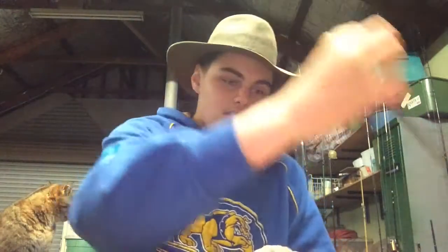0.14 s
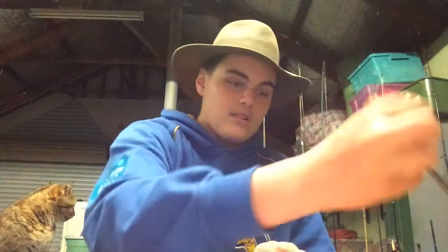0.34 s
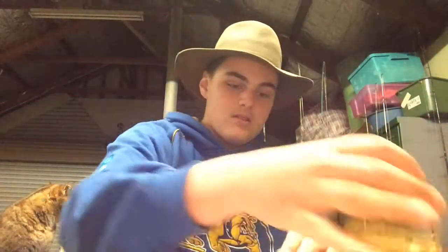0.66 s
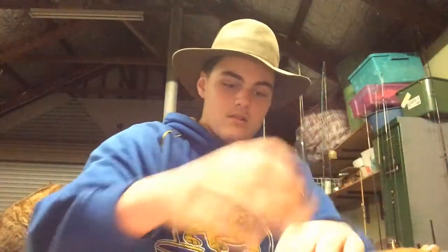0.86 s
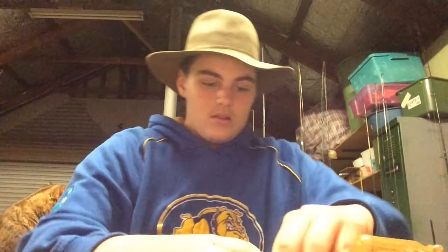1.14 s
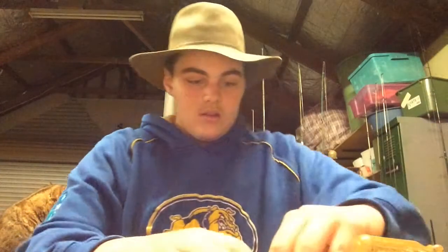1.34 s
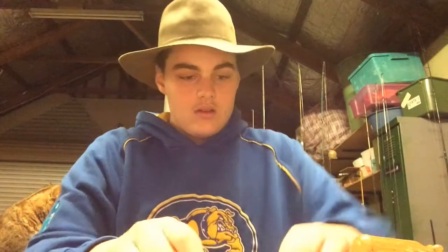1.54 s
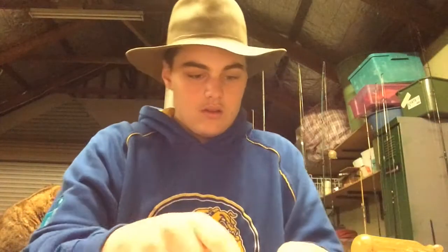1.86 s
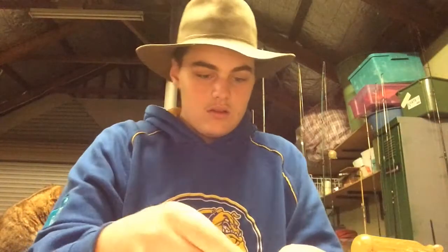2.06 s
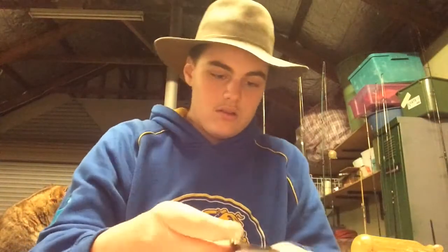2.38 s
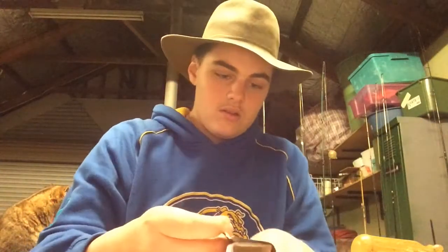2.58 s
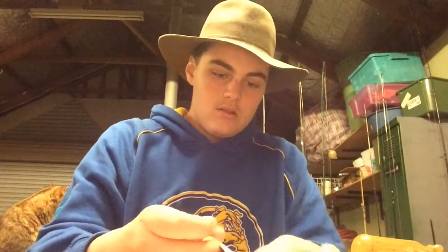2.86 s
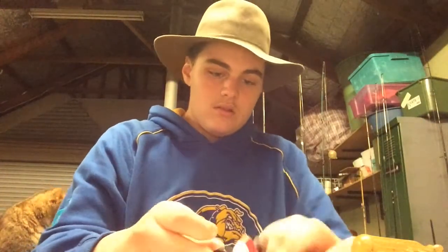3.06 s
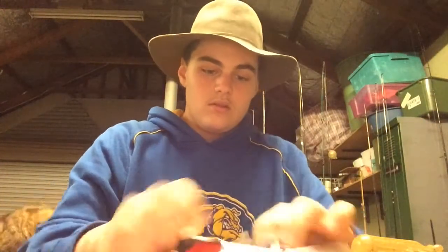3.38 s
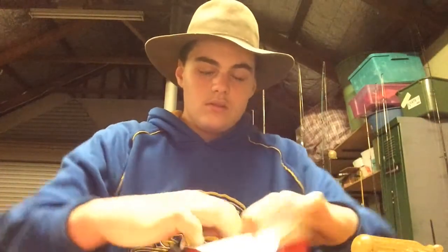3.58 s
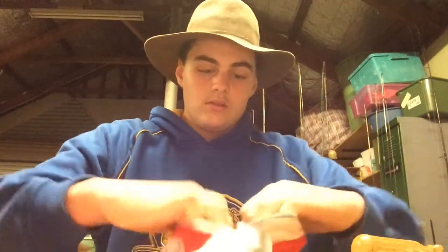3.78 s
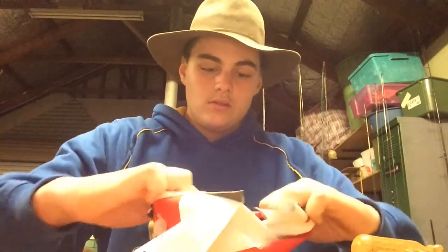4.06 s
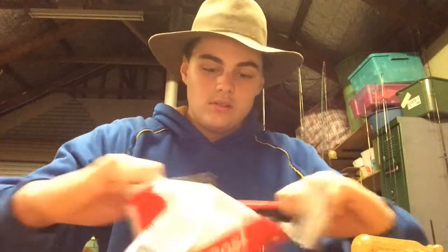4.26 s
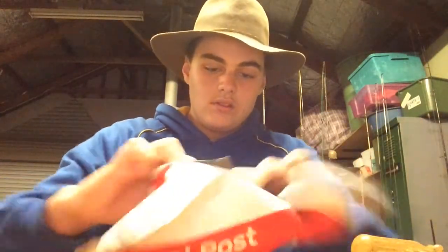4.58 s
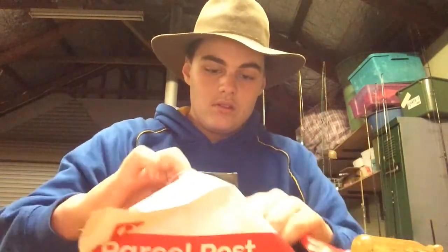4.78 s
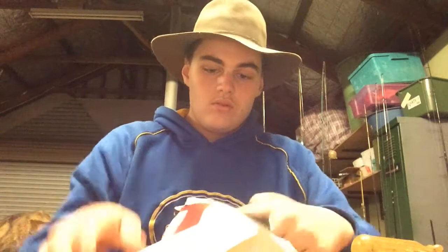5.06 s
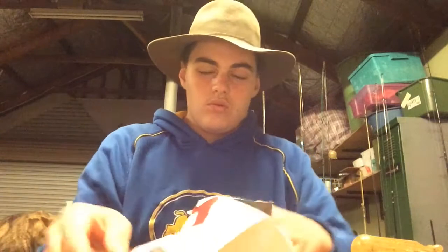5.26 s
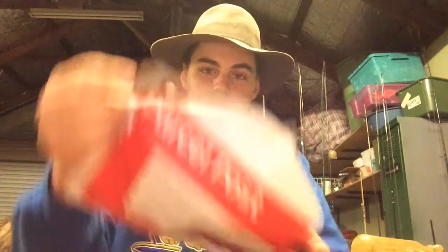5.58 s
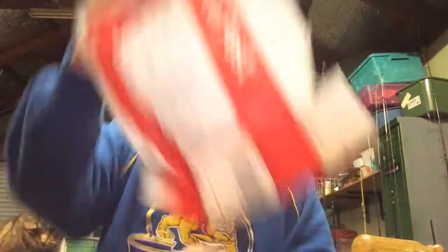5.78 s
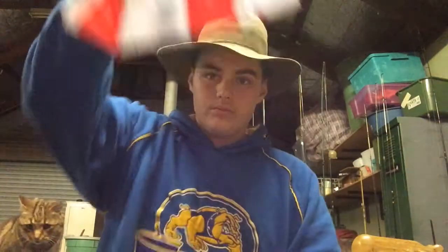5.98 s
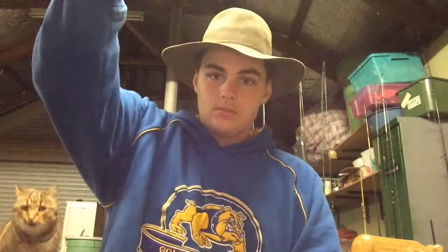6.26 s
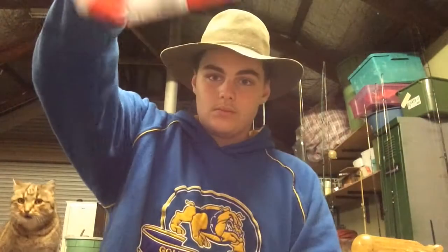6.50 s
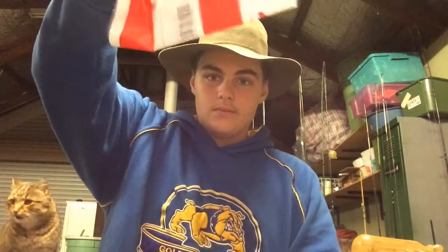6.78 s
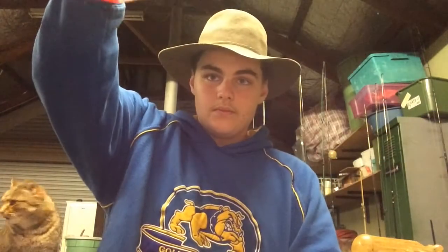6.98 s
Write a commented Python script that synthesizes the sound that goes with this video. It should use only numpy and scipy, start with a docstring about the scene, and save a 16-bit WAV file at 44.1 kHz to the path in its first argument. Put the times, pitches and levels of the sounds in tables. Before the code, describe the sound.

A screwdriver knocks and clatters onto a wooden workbench, then a plastic mail bag is crinkled, torn open and shaken.

```python
"""First comes a low scrape, then a screwdriver knocks and drops on a wooden workbench in a shed.
The boards ring, the steel shaft clinks and the handle clacks. Next a plastic mail bag is pierced,
torn and shaken. Its thin film buckles (folds suddenly) in crackling clumps with louder snaps,
and the bench carries the thuds to a small microphone that overloads on the hardest hits."""
import sys
import numpy as np
from scipy import signal
from scipy.fft import rfft, irfft
from scipy.io import wavfile
from scipy.ndimage import uniform_filter1d

SR = 44100
rng = np.random.default_rng(int(sys.argv[2]) if len(sys.argv) > 2 else 0)


def materialize(psi):
    """Save the field psi as 16-bit PCM at rate SR to the path in sys.argv[1].

    A 1-D psi becomes a single channel; in a 2-D psi each row is a channel.
    """
    bounded = np.clip(np.atleast_2d(psi).T, -1, 1)
    quanta = np.round(bounded * 32767).astype(np.int16)
    wavfile.write(sys.argv[1], SR, quanta)


N = 314433

# A "colour" says how strong each frequency is. A "fade" is the time taken to drop by 60 dB.
# Low sliding rumble and a faint hiss that dips after the loud knocks: (time [s], rumble [dB], hiss [dB])
SLIDE_LEVELS = [(0.0, -35, -49), (0.144, -59.5, -45.5), (0.326, -40.5, -53.5), (0.488, -29, -42.5),
                (0.575, -42, -53), (0.63, -38.5, -55), (0.69, -41, -61), (0.826, -25.5, -86),
                (0.948, -47, -45.5), (1.098, -37.5, -45.5), (1.244, -46.5, -58), (1.36, -50, -49.5),
                (1.45, -49, -45)]
# Colour of that faint hiss: (frequency [Hz], level [dB])
HISS_COLOUR = [(710, 1.5), (1200, -1), (3010, -4), (5590, -6.5), (6100, -2.5), (7740, -9), (16000, -13.5)]
# Colour of the air in the shed: (frequency [Hz], level [dB])
AIR_COLOUR = [(24, -29), (40, 14), (455, -7.5), (733, 2), (810, -8), (1720, -16), (2500, -49),
              (4030, -36.5), (16000, -41)]
# The tones the bench rings with: (frequency [Hz], level [dB], base fade [s])
BENCH_TONES = [(118.2, -14.5, 0.25), (197, -8, 0.057), (233.5, -10, 0.11), (289.4, -4, 0.084),
               (320, -11, 0.076), (390, 7.5, 0.021), (583.5, 0.5, 0.05), (708, -6.5, 0.067),
               (890, 7, 0.031), (1013, -5.5, 0.042), (1205, -12, 0.061), (1420, 4.5, 0.02),
               (1860, 7, 0.0073), (2920, -3, 0.013)]
# Blows on the bench:
# (time [s], level [dB], favoured pitch [Hz], relative clatter [dB], ring length [factor], rise [ms])
BENCH_KNOCKS = [(0.195, -20, 1130, 6, 0.062, 1.4), (0.3192, 8, 660, -13, 0.84, 4.5),
                (0.328, -17, 118, -30, 1.1, 8.8), (0.463, -18, 590, -30, 1.2, 3),
                (0.49, -17.5, 890, -37, 0.59, 0.97), (0.507, -16, 320, -32, 0.56, 3.7),
                (0.546, -24.5, 115, -30, 0.39, 9), (0.609, -34.5, 305, -7, 2.4, 30),
                (0.733, 5.5, 307, -7, 0.58, 3.5), (0.783, -3, 310, -15.5, 1.1, 2.1),
                (0.811, -0.5, 356, -26, 0.76, 1.5), (0.996, -2.5, 950, -4.5, 0.86, 1.3),
                (1.023, -4, 304, -18, 0.79, 2.7), (1.073, -15.5, 990, -5, 1.93, 0.74),
                (1.089, -10.5, 583, -24, 0.43, 3.8), (1.108, -16.5, 590, -20, 0.35, 2.6),
                (1.2094, -16, 1470, -6, 0.16, 0.18), (1.325, -15, 204, -11.5, 0.2, 8.3)]
# Colour of the clatter, a crowd of high tones: (frequency [Hz], level [dB])
CLATTER_COLOUR = [(500, -32), (1200, 3), (2000, 1), (2600, -8.5), (3700, -7.5), (4400, -7), (7000, -9.5),
                  (16000, -44)]
# How long the shed echoes: (frequency [Hz], fade [s])
SHED_FADES = [(200, 0.22), (800, 0.24), (2000, 0.25), (4000, 0.27), (12000, 0.21)]
# Steel hitting steel: (time [s], level [dB])
SHAFT_HITS = [(0.4566, -4.5)]
# The tones of the steel shaft: (frequency [Hz], level [dB], fade [s])
SHAFT_TONES = [(2735, -11.5, 0.2), (4500, -4, 0.2), (6230, 0, 0.24), (6713, -8, 0.19), (7360, 0, 0.12),
               (8800, -10, 0.15), (9930, -16, 0.18), (11600, -8, 0.14)]
# Colour of the tick that starts a clink: (frequency [Hz], level [dB])
CLINK_COLOUR = [(590, -14), (1000, -5.5), (1420, -7), (3840, -13.5), (4450, -3), (5310, -14.5), (10100, -4),
                (16000, -20)]
# The hard handle landing on its edge: (time [s], level [dB])
HANDLE_HITS = [(0.7317, -20), (0.9958, -8.5), (1.0766, -27.5)]
# The tones of the handle: (frequency [Hz], level [dB], fade [s])
HANDLE_TONES = [(1870, 4.5, 0.016), (2430, -4, 0.015), (2930, 3, 0.033), (3390, -0.5, 0.033)]
# The loose tip ticking on the bench: (time [s], level [dB], middle frequency [Hz])
TIP_HITS = [(0.956, -35, 6800), (1.035, -33, 9500), (1.064, -23, 12500), (1.2096, -9.5, 2960),
            (1.218, -22, 6000)]
# The quiet rustle of film that is never still: (time [s], crackle [dB], hiss against crackle [dB])
RUSTLE_LEVELS = [(1.35, -77, 16), (1.5, -47, 4), (1.8, -53, 5), (1.89, -54, 5.5), (2.27, -53.5, -2.5),
                 (2.48, -48, -1.5), (2.7, -46, 0.5), (3.0, -44.5, 8.5), (3.35, -52, 4.5), (3.57, -46, 3.5),
                 (3.9, -35.5, -20), (4.15, -40.5, -10), (4.58, -41, -5), (4.8, -52, -11), (4.92, -53, 3),
                 (5.2, -41, -1), (5.6, -37, -6.5), (5.77, -52.5, -5), (6.0, -50.5, -5), (6.17, -57, 6),
                 (6.24, -60.5, -2), (6.42, -54.5, -3), (6.8, -50, -3.5), (7.125, -55, -6.5)]
# Grips, pulls, rips and flaps:
# (time of full strength [s], swell [s], hold [s], crackle [dB], fizz against crackle [dB])
BAG_GRIPS = [(1.529, 0.013, 0.11, -41.5, 1.5), (1.719, 0.056, 0.093, -42, 4.5),
             (1.917, 0.014, 0.02, -46, 6), (2.132, 0.22, 0.026, -37, 2.5), (2.174, 0.0026, 0.016, -40, -6),
             (2.377, 0.14, 0.026, -38.5, -0.5), (2.564, 0.13, 0.081, -45, 7),
             (2.758, 0.25, 0.0081, -43, -14), (2.838, 0.016, 0.17, -39.5, 2.5),
             (3.027, 0.044, 0.06, -28.5, -1.5), (3.118, 0.031, 0.19, -33.5, -9),
             (3.188, .005, 0.048, -28.5, -4), (3.448, 0.1, 0.031, -33, -3),
             (3.593, 0.018, 0.062, -36, -1.5), (3.661, 0.0036, 0.0059, -28.5, -5),
             (3.724, 0.015, 0.008, -29, -3), (3.783, 0.0073, 0.0089, -30, -3),
             (3.86, 0.048, 0.037, -26, -1), (4.009, 0.083, 0.044, -25, -4), (4.217, 0.027, 0.018, -33, -3),
             (4.263, 0.004, 0.046, -17, -11), (4.446, 0.051, 0.074, -38.5, -5),
             (4.624, .02, 0.14, -34.5, -5.5), (4.731, 0.036, 0.012, -29.5, -9),
             (4.792, 0.034, 0.092, -34, -2.5), (4.935, 0.0067, 0.018, -26, -8.5),
             (4.981, .01, 0.13, -36, 0.5), (5.211, 0.033, 0.12, -35, -0.5), (5.372, .01, 0.055, -33.5, 0),
             (5.484, 0.029, 0.082, -28, -8), (5.639, 0.018, 0.038, -38.5, -6.5),
             (5.843, 0.1, 0.028, -41.5, -10), (5.938, 0.026, 0.048, -35, -18),
             (6.038, 0.012, 0.015, -42.5, -1.5), (6.077, 0.027, 0.026, -37, -14),
             (6.346, 0.017, 0.12, -47.5, -10), (6.472, 0.039, 0.034, -30.5, -6),
             (6.553, .02, 0.017, -40.5, -5), (6.658, 0.051, 0.03, -31, -7), (6.75, 0.012, 0.01, -36.5, -11),
             (6.845, 0.013, 0.038, -31.5, -5)]
# Colour of the plastic film: (frequency [Hz], level [dB])
FILM_COLOUR = [(290, -25), (500, 4.5), (688, -1.5), (1190, 5.5), (1360, 2.5), (1820, 4), (2330, 1),
               (2610, -3), (3060, -1.5), (3700, -5), (7420, -8), (15100, -19.5), (16000, -13.5)]
# Colour of the bag's thuds through the bench: (frequency [Hz], level [dB])
THUD_COLOUR = [(24, -56), (45, -9), (108, -2.5), (265, -8), (382, -3), (427, -13.5), (522, -13), (800, -13),
               (1040, -55), (1760, -120)]
# Hands and contents bumping the bench: (time [s], level [dB], favoured pitch [Hz])
SOFT_BUMPS = [(1.357, -32, 111), (2.127, -32, 199), (2.388, -27, 226), (2.572, -26, 279), (2.838, -25, 400),
              (3.188, -25, 113), (3.662, -25.5, 102), (4.007, -22, 113), (4.269, -16, 390),
              (4.724, -20, 393), (4.84, -28, 107), (4.982, -16, 372), (5.094, -18, 178), (5.37, -24, 133),
              (5.487, -30, 108), (6.682, -34.5, 84.2), (6.853, -27, 274)]
# Loud buckles of the film: (time [s], ring level [dB], ring pitch [Hz], fizz level [dB])
LOUD_SNAPS = [(1.4295, -22.5, 1960, -31), (1.55, -38, 2310, -26), (1.6453, -20, 1680, -38),
              (1.711, -19, 1640, -18.5), (1.735, -21, 2270, -33), (1.7574, -11, 1700, -23),
              (1.8178, -25, 1830, -20), (1.91, -19.5, 2250, -25), (2.009, -22.5, 2290, -21.5),
              (2.054, -20.5, 1420, -10.5), (2.117, -21, 1680, -21), (2.14, -10.5, 1720, -13.5),
              (2.161, -12, 1460, -6), (2.167, -9.5, 3570, -16), (2.3, -28, 1640, -30),
              (2.3378, -23, 3000, -24.5), (2.371, -20, 2930, -15.5), (2.3837, -16, 1800, -30),
              (2.3908, -15.5, 1510, -18), (2.446, -23, 2190, -23.5), (2.4956, -19, 1460, -33),
              (2.5509, -14.5, 2450, -22.5), (2.578, -13.5, 1450, -13), (2.741, -20.5, 1440, -36),
              (2.7547, -20, 1800, -23.5), (2.7879, -16, 2800, -19.5), (2.792, -21, 1610, -21),
              (2.848, -13, 1470, -31), (2.861, -18, 1430, -16), (2.893, -12, 1690, -20),
              (2.906, -14.5, 1670, -36), (2.917, -18, 2600, -18), (2.9595, -30, 3350, -12.5),
              (2.967, -14, 3300, -20), (2.989, -15, 1470, -16), (3.0108, -15, 1530, -7),
              (3.025, -6, 1790, -12), (3.1116, -15, 3300, -15), (3.1188, 0, 1750, -8.5),
              (3.139, -8, 1560, -13), (3.1591, -12, 3130, -11), (3.181, -29, 2720, -11),
              (3.1919, -10, 1157, -21), (3.195, -23, 2660, -7), (3.2044, -12, 1680, -7.5),
              (3.2297, -19, 1480, -13), (3.241, -13, 1210, -6.5), (3.272, -13, 1810, -47),
              (3.2794, -14, 1740, -17.5), (3.299, -27, 1790, -15), (3.442, -15, 1730, -23),
              (3.5167, -9.5, 1290, -9.5), (3.592, -23, 2400, -19.5), (3.603, -25.5, 1720, -24),
              (3.644, -15, 1780, -12.5), (3.656, -8, 1770, -16), (3.668, -4.5, 1790, -7.5),
              (3.675, -7, 1990, -8.5), (3.7224, -20, 1800, -12.5), (3.759, -32, 1920, -18.5),
              (3.782, -12, 1270, -20), (3.825, -7, 2090, -16), (3.85, -14, 2100, -6),
              (3.8629, -8, 1700, -17), (3.894, -19, 1720, -11.5), (3.918, -11, 2020, -8.5),
              (3.948, -9, 2200, -8), (3.9769, -13, 1290, -11.5), (3.996, -5.5, 3280, -18),
              (4.0105, -2, 1670, -6), (4.0365, 2.5, 1670, -13.5), (4.057, -17, 1590, -14),
              (4.0684, -9, 1450, -18), (4.0902, -9.5, 3250, -10), (4.1086, -13, 1470, -12.5),
              (4.152, -14, 1630, -45), (4.1738, -14, 1530, -17.5), (4.1837, -8, 3270, -12),
              (4.2074, -26, 1990, -17), (4.211, -5.5, 1790, -14), (4.23, -19, 1880, -13),
              (4.2378, -11, 1820, -15.5), (4.2599, -22, 1640, -13), (4.2698, 1.5, 2280, -6),
              (4.3066, -19, 1640, -9), (4.3268, 2, 1870, -14), (4.347, -5, 1900, -12),
              (4.4113, -12.5, 1930, -34), (4.4736, -12, 2060, -14.5), (4.503, -16, 2480, -20),
              (4.604, -14.5, 1520, -19), (4.645, -17, 1880, -35), (4.6654, -7, 2980, -29),
              (4.679, -27, 2100, -15), (4.7041, -12, 1690, -13.5), (4.721, -22, 1790, -17),
              (4.7255, -6.5, 3220, -7), (4.735, -8, 3130, -29), (4.781, -15.5, 1700, -22.5),
              (4.955, -16, 1660, -15.5), (4.992, -9.5, 1640, -26), (5.008, -15, 1160, -26),
              (5.0222, -8.5, 2280, -21), (5.0417, -10.5, 1740, -23), (5.1618, -12.5, 1410, -18.5),
              (5.233, -16, 1670, -12.5), (5.254, -15, 1870, -23), (5.3053, -19, 1140, -31),
              (5.3783, -4, 2820, -29), (5.4155, -9, 2450, -13), (5.474, -12, 1750, -25),
              (5.5122, -8.5, 1860, -23), (5.556, -9, 2300, -39), (5.58, -11.5, 1820, -41),
              (5.6417, -15, 1630, -30), (5.675, -18.5, 960, -33), (5.764, -24, 1380, -57),
              (5.829, -30, 1600, -27), (5.86, -20.5, 1690, -29), (5.887, -12.5, 1750, -27.5),
              (5.915, -17.5, 1730, -34), (5.95, -18, 1700, -36), (5.9586, -13.5, 1750, -46),
              (6.041, -16, 1230, -43), (6.073, -17, 1730, -45), (6.091, -11.5, 1750, -21),
              (6.112, -18.5, 1180, -38), (6.248, -30.5, 1730, -43), (6.284, -22.5, 1270, -40.5),
              (6.3736, -45, 1030, -32.5), (6.455, -17, 1760, -36), (6.4769, -12, 1210, -15.5),
              (6.485, -5.5, 1830, -38), (6.508, -10, 1805, -36), (6.555, -19, 1890, -40),
              (6.6398, -21.5, 1270, -33), (6.7501, -17, 1870, -42), (6.851, -24, 1700, -44),
              (6.8813, -8.5, 1800, -26), (6.9354, -20, 1730, -48), (6.9459, -19, 1770, -37),
              (6.994, -25.5, 1820, -68)]
# Loudness of the long tear: (time [s], level [dB])
RIP_LEVELS = [(4.267, -50), (4.272, -12.5), (4.3, -14), (4.322, -21.5), (4.33, -8.5), (4.345, -19.5),
              (4.358, -28), (4.368, -50)]
# Colour of the long tear: (frequency [Hz], level [dB])
TEAR_COLOUR = [(88, -33.5), (150, -11), (361, -2.5), (689, -15), (1140, -13.5), (1360, -22), (1870, -8),
               (7770, -16), (16000, -35)]

AIR_DB, TOP_HZ = -59.5, 16000
SPLIT_HZ, RUSTLE_FIZZ_DB = 3300, -36  # the film's "body" lies below the split, its "fizz" above
SWELL_DB, LET_GO_DB_PER_S = 30, 390  # a grip rises this far in its swell, then dies away
THUD_DB, THUD_FOLLOWS = -41, 0.75  # thud when the crackle is at -40 dB; dB of thud per dB of crackle
SHEET_HZ, SHEET_DB = (1435, 1780), (-9, -5.5)  # the tight sheet rings: band; level against crackle, hiss
SMALL_PER_S, SMALL_DB, SMALL_SPREAD_DB, SMALL_HZ = 22, 10.5, 4, (1140, 2600)  # the lesser snaps
TINT_HZ, TINT_DB, TINT_OCTAVES = (3000, 12500), 6, 0.3  # each snap favours a band: range, boost, width
RING_CYCLES = 53  # a snap's ring drops 60 dB in this many cycles
LIFTED_S, LIFTED_THUD_DB, LIFTED_SHED_DB = 5.75, -3, 1.5  # the bag is held up: less thud, more echo
FLAP_HZ, FLAP_DB, LIFTED_DULL_HZ = (470, 760), -10.5, 2400  # held up, it flaps and sounds duller


def gain_of(db):
    """Turns decibels into a number to multiply by."""
    return 10 ** (np.asarray(db) / 20)


def evened(x):
    """Scales a signal to an average power of 1."""
    return x / np.sqrt(np.mean(x ** 2) + 1e-20)


def read(points, hz):
    """Looks up a value between the rows of a frequency table, spaced by pitch."""
    f, value = np.transpose(points)
    return np.interp(np.log(hz + 1), np.log(f + 1), value)


def add(mix, s, sound):
    """Mixes a sound in at s seconds."""
    part = mix[round(s * SR):][:len(sound)]
    part += sound[:len(part)]


def filtered(x, order, hz, kind="low"):
    """Keeps the lows, the highs or one band; a higher order cuts more steeply."""
    return signal.sosfilt(signal.butter(order, hz, kind, fs=SR, output="sos"), x)


def coloured(x, points):
    """Gives a sound a colour, with a filter that rings only after each hit."""
    hz = abs(np.fft.fftfreq(8192, 1 / SR))
    log_gain = np.log(gain_of(np.maximum(read(points, hz), -90)))
    taps = np.fft.ifft(np.exp(np.conj(signal.hilbert(log_gain)))).real[:4096]
    return signal.oaconvolve(x, taps[None] if x.ndim > 1 else taps, axes=-1)[..., :x.shape[-1]]


def film_bands(x):
    """Gives a sound the film's colour and splits it into body and fizz."""
    film = coloured(x, FILM_COLOUR)
    return [filtered(film, 4, SPLIT_HZ, kind) for kind in ("low", "high")]


def curves(rows):
    """Joins timed rows into curves, with a gate that is open from the first row to the last."""
    s, *cols = np.transpose(rows)
    t = np.arange(N) / SR
    gate = uniform_filter1d(1. * ((t >= s[0]) & (t <= s[-1])), size=2000)
    return [np.interp(t, s, c) for c in cols], gate


def drift(hz):
    """A random wander that changes about hz times a second."""
    return evened(signal.lfilter([1], [1, -np.exp(-2 * np.pi * hz / SR)], rng.standard_normal(N)))


def flutter(shape, samples):
    """A random wobble, smoothed over this many samples."""
    return evened(uniform_filter1d(rng.standard_normal(shape), size=samples))


def slide():
    """Lumpy rubbing shakes the bench's low tones; a faint hiss dips after the loud knocks."""
    (rumble_db, hiss_db), gate = curves(SLIDE_LEVELS)
    hz, db, fade = np.transpose(BENCH_TONES)[:, :, None]
    t = np.arange(8000) / SR
    wood = (gain_of(db - 2.1 * np.log2(hz) - 60 * t / fade) * np.sin(2 * np.pi * hz * t)).sum(0)
    rubbing = rng.standard_normal(N) * gain_of(3.7 * drift(28.0))
    rumble = signal.oaconvolve(rubbing, wood)[:N]
    hiss = coloured(rng.standard_normal(N), HISS_COLOUR)
    return gate * (gain_of(rumble_db) * evened(rumble) + gain_of(hiss_db) * evened(hiss))


def air():
    """The shed's air makes a faint, steady, low noise."""
    return gain_of(AIR_DB) * evened(coloured(rng.standard_normal(N), AIR_COLOUR))


def bench_ring(t, struck_hz, length, rise_s, focus_db):
    """The struck bench rings; its tones lose focus_db for each octave away from struck_hz."""
    hz, db, fade = np.transpose(BENCH_TONES)[:, :, None]
    near_db = -focus_db * abs(np.log2(hz / struck_hz))
    phase, twin_phase, apart = rng.random((3,) + hz.shape)
    # every tone has a weaker twin close by, so the ring pulses unevenly
    twin = np.sin(2 * np.pi * (hz * (.94 + 0.16 * apart) * t + twin_phase))
    wave = np.sin(2 * np.pi * (hz * t + phase)) + 0.59 * twin
    wave *= 1 + 0.26 * flutter(wave.shape, samples=400)  # loose boards chatter
    ring = (gain_of(db + near_db - 60 * t / (fade * length)) * wave).sum(0)
    ring *= (1 - np.exp(-t / rise_s)) ** 2
    return ring / abs(ring).max()


def knocks():
    """Each blow rings the bench and adds a clatter: a crack, then a duller tail."""
    out, t = np.zeros(N), np.arange(SR // 3) / SR
    for s, level_db, struck_hz, clatter_db, length, rise_ms in BENCH_KNOCKS:
        noise = evened(coloured(rng.standard_normal(len(t) + 2000), CLATTER_COLOUR))
        crack = noise[2000:] * gain_of(-60 * t / 0.014) * (1 - np.exp(-t / 0.001)) ** 2
        tail = filtered(noise, 4, 3900)[2000:] * gain_of(1.5 - 60 * t / (0.078 * length))
        ring = bench_ring(t, struck_hz, length, rise_ms / 1000, focus_db=7.0)
        add(out, s, gain_of(level_db) * (ring + gain_of(clatter_db - 4.0) * (crack + tail)))
    return out


def shed_echo(x):
    """Many small echoes blur into a tail, each frequency dying at its own speed."""
    echoes = np.zeros(SR // 2)
    at = np.arange(200, len(echoes) - 20, 20)
    echoes[at + rng.integers(0, 20, len(at))] = rng.choice([-1., 1.], len(at))
    hz, t, spectrum = signal.stft(echoes, SR, nperseg=256)
    tail = signal.istft(spectrum * gain_of(-60 * t / read(SHED_FADES, hz)[:, None]), SR, nperseg=256)[1]
    return signal.oaconvolve(x, tail / np.linalg.norm(tail))[:N]


def shaft_clinks():
    """The steel shaft gives a bright tick, and its high tones flutter as it rattles."""
    out, t = np.zeros(N), np.arange(SR // 3) / SR
    hz, db, fade = np.transpose(SHAFT_TONES)[:, :, None]
    for s, level_db in SHAFT_HITS:
        rattle = 1 + 0.99 * flutter((len(hz), len(t)), samples=250)
        ring = (gain_of(db - 60 * t / fade) * rattle * np.sin(2 * np.pi * hz * t)).sum(0)
        noise = evened(coloured(rng.standard_normal(len(t)), CLINK_COLOUR))
        tick = noise * (gain_of(-60 * t / 0.038) + gain_of(-13.0 - 60 * t / 0.068))
        add(out, s, gain_of(level_db) * (0.042 * ring + 0.47 * tick))
    return out


def handle_clacks():
    """The plastic handle rings briefly, fading unevenly as it chatters."""
    out, t = np.zeros(N), np.arange(4000) / SR
    hz, db, fade = np.transpose(HANDLE_TONES)[:, :, None]
    for s, level_db in HANDLE_HITS:
        chatter = 1 + 0.2 * flutter((len(hz), len(t)), samples=80)
        tones = np.sin(2 * np.pi * (hz * t + rng.random(hz.shape)))
        ring = (gain_of(db - 60 * t / fade) * chatter * tones).sum(0)
        add(out, s, gain_of(level_db) * ring * (1 - np.exp(-t / 0.00015)))
    return out


def tip_ticks():
    """The loose tip taps the bench: a sharp click with a little noise, about an octave wide."""
    out, t = np.zeros(N), np.arange(600) / SR
    for s, level_db, middle_hz in TIP_HITS:
        click = (t == 0) + 0.16 * rng.standard_normal(len(t)) * gain_of(-60 * t / .012)
        tick = filtered(click, 2, (middle_hz / 1.5, middle_hz * 1.5), "band")
        add(out, s, gain_of(level_db) * tick / abs(tick).max())
    return out


def handling():
    """How strongly the hands stir up body, fizz and hiss: the rustle and the grips add as power."""
    (rustle_db, hiss_db), gate = curves(RUSTLE_LEVELS)
    t = np.arange(N) / SR
    body, fizz = gain_of(2 * rustle_db), gain_of(2 * (rustle_db + RUSTLE_FIZZ_DB))
    for s, swell, hold, grip_db, fizz_db in BAG_GRIPS:
        part = slice(round((s - .3) * SR), round((s + hold + .3) * SR))
        early, late = np.maximum(s - t[part], 0), np.maximum(t[part] - s - hold, 0)
        db = grip_db - SWELL_DB * early / swell - LET_GO_DB_PER_S * late
        add(body, part.start / SR, gain_of(2 * db))
        add(fizz, part.start / SR, gain_of(2 * (db + fizz_db)))
    return gate * np.sqrt([body, fizz, gain_of(2 * (rustle_db + hiss_db))])


def crackle(per_s=600., spread_db=5.0, clump_db=2.5, wash=0.99, kinds=24):
    """Tiny buckles, each a short ringing burst, swell in clumps over a wash of noise."""
    clumps = gain_of(clump_db * drift(22.0))
    sizes = gain_of(spread_db * np.minimum(rng.exponential(1, N), 3.2))
    kicks = sizes * (rng.random(N) < per_s / SR)
    kind = rng.integers(0, kinds, N)
    buckles, t = np.zeros(N), np.arange(500) / SR
    for k in range(kinds):
        hz = np.exp(rng.uniform(np.log(900), np.log(10000)))
        fade = rng.uniform(.002, .009)
        shape = gain_of(-60 * t / fade) * np.minimum(t / .0006, 1)
        burst = (rng.standard_normal(len(t)) + np.sin(2 * np.pi * hz * t)) * shape
        buckles += signal.oaconvolve(kicks * (kind == k), burst / np.linalg.norm(burst))[:N]
    return clumps * (evened(buckles) + wash * rng.standard_normal(N)), clumps


def bag():
    """The film crackles, hisses and rings, and its clumps thud on the bench. Held up, it flaps."""
    body_gain, fizz_gain, hiss_gain = handling()
    buckles, clumps = crackle()
    body, fizz = map(evened, film_bands(buckles))
    hiss = evened(film_bands(rng.standard_normal(N))[1])
    sheet = evened(filtered(rng.standard_normal(N), 2, SHEET_HZ, "band"))
    push = evened(clumps * gain_of(5.4 * drift(14.5)) * rng.standard_normal(N)) + .5 * evened(buckles)
    thud = evened(coloured(push, THUD_COLOUR))
    lifted = np.arange(N) / SR > LIFTED_S
    flap = gain_of(FLAP_DB) * evened(filtered(buckles, 2, FLAP_HZ, "band"))
    body = np.where(lifted, filtered(body, 2, LIFTED_DULL_HZ) + flap, body)
    thud_gain = gain_of(THUD_DB + LIFTED_THUD_DB * lifted) * (100 * body_gain) ** THUD_FOLLOWS
    sheet_gain = np.hypot(gain_of(SHEET_DB[0]) * body_gain, gain_of(SHEET_DB[1]) * hiss_gain)
    return sheet_gain * sheet + body_gain * body + fizz_gain * fizz + hiss_gain * hiss + thud_gain * thud


def thumps():
    """Soft bumps mostly wake the bench's low tones."""
    out, t = np.zeros(N), np.arange(SR // 3) / SR
    for s, level_db, struck_hz in SOFT_BUMPS:
        add(out, s, gain_of(level_db) * bench_ring(t, struck_hz, length=0.77, rise_s=0.003, focus_db=9.5))
    return out


def small_snaps():
    """Lists lesser buckles at random moments, as strong as the handling is just then."""
    body_gain, fizz_gain, _ = handling()
    when, pitch, low, high = rng.random((400, 4)).T
    s = RUSTLE_LEVELS[0][0] - np.cumsum(np.log(when + 1e-9)) / SMALL_PER_S
    at = np.minimum(s * SR, N - 1).astype(int)
    ring_db = 20 * np.log10(body_gain[at] + 1e-9) + SMALL_DB + SMALL_SPREAD_DB * (2 * low - 1)
    fizz_db = 20 * np.log10(fizz_gain[at] + 1e-9) + SMALL_DB + SMALL_SPREAD_DB * (2 * high - 1)
    hz = SMALL_HZ[0] * (SMALL_HZ[1] / SMALL_HZ[0]) ** pitch
    return [row for row in zip(s, ring_db, hz, fizz_db) if row[0] < RUSTLE_LEVELS[-1][0]]


def snaps():
    """Each buckle is a short burst, part noise and part ring, with a fizz of its own tint and length."""
    out, t = np.zeros(N), np.arange(1500) / SR
    rows = LOUD_SNAPS + small_snaps()
    noise = rng.standard_normal((len(LOUD_SNAPS) + 400, len(t)))
    tint, length = rng.random((len(noise), 2)).T[:, :, None]
    tint_hz = TINT_HZ[0] * (TINT_HZ[1] / TINT_HZ[0]) ** tint
    octaves = np.log2((np.fft.rfftfreq(len(t), 1 / SR) + 1) / tint_hz)
    tinted = irfft(rfft(noise) * gain_of(TINT_DB * np.exp(-(octaves / TINT_OCTAVES) ** 2)), len(t))
    rise = (1 - np.exp(-t / 0.0005)) ** 2
    bodies = film_bands(noise * rise * gain_of(-60 * t / 0.035))[0]
    fizz_shape = gain_of(-60 * t / (0.0054 + 0.0027 * length)) + gain_of(-20.5 - 60 * t / 0.087)
    fizzes = film_bands(tinted * rise * fizz_shape)[1]
    wobble = uniform_filter1d(noise[:, ::-1], size=60)  # the ring wavers as the crease moves
    bends = 0.0092 * np.cumsum(evened(wobble), axis=1)
    for (s, ring_db, hz, fizz_db), body, fizz, bend in zip(rows, bodies, fizzes, bends):
        tone = rise * np.sin(2 * np.pi * hz * t + bend) * gain_of(-60 * t * hz / RING_CYCLES)
        ring = 0.058 * evened(body) + 0.5 * tone
        add(out, s, gain_of(ring_db) * ring + gain_of(fizz_db) * 0.13 * evened(fizz))
    return out


def rip():
    """The film gives way in one dense, rough burst."""
    rough = rng.standard_normal(N) * gain_of(3.0 * drift(130.0))
    level_db = np.interp(np.arange(N) / SR, *np.transpose(RIP_LEVELS), left=-120, right=-120)
    return gain_of(level_db) * evened(coloured(rough, TEAR_COLOUR))


def scene():
    """Mixes everything close to the microphone, with a little of the shed's echo and air."""
    tool = knocks() + shaft_clinks() + tip_ticks()
    film = bag() + snaps() + thumps() + rip()
    film_echo_db = -17.0 + LIFTED_SHED_DB * (np.arange(N) / SR > LIFTED_S)
    to_walls = gain_of(-10.5) * tool + gain_of(film_echo_db) * film
    return (air() + tool + handle_clacks() + film + shed_echo(to_walls) + slide())[None]


def record(dry):
    """The small microphone squashes the loudest peaks and loses the deepest bass and highest treble."""
    clipped = dry / (1 + abs(dry) ** 8) ** (1 / 8)
    thin = filtered(clipped, 4, 48, "high")
    treble_cut = signal.firwin(511, TOP_HZ, window=("kaiser", 9), fs=SR)
    return signal.oaconvolve(thin, treble_cut[None], "same")


dry = scene()
out = record(dry)
materialize(out)
```